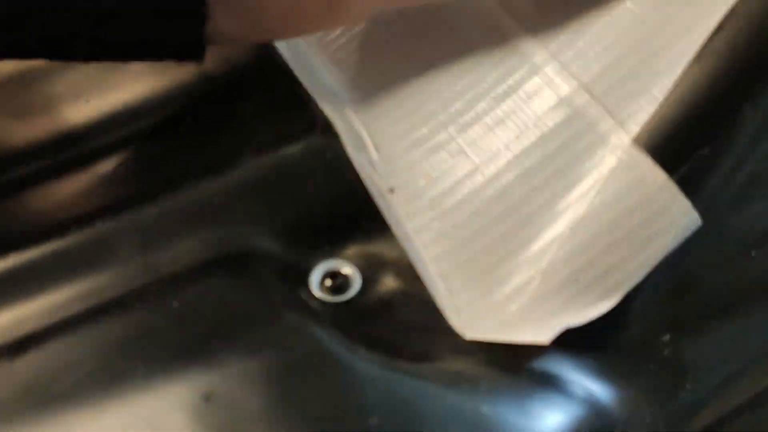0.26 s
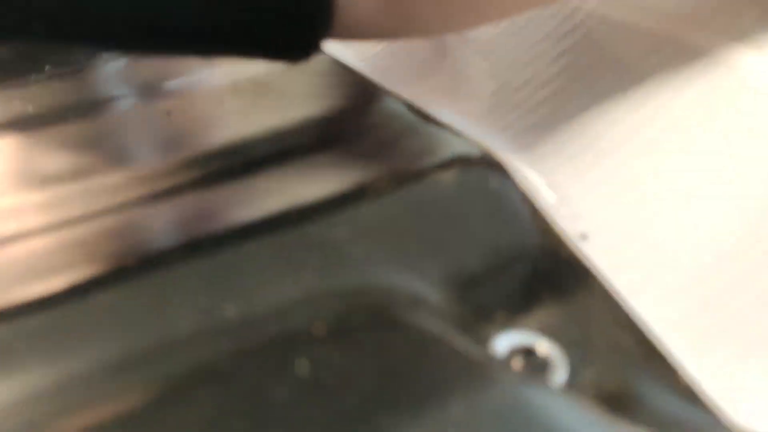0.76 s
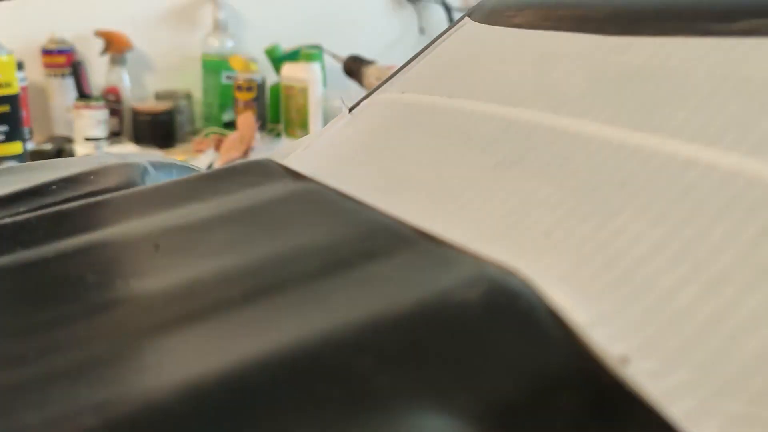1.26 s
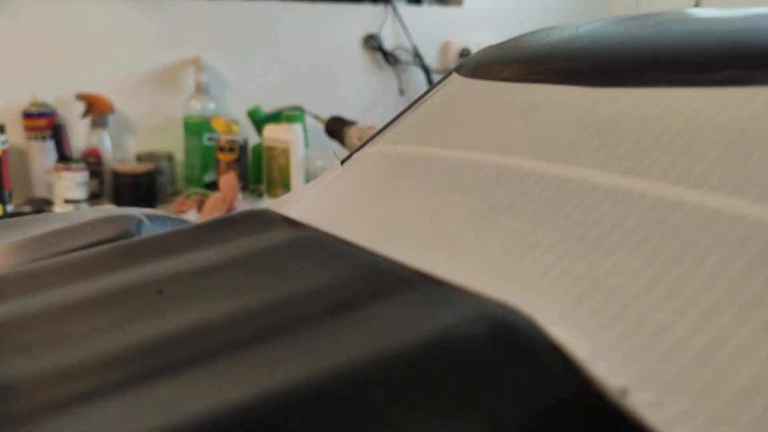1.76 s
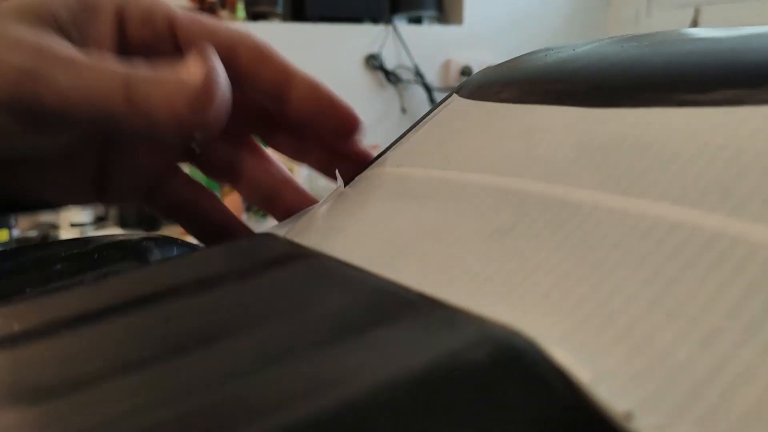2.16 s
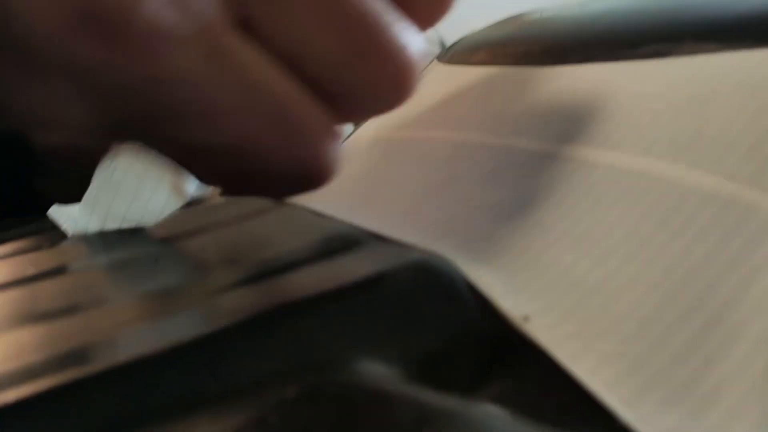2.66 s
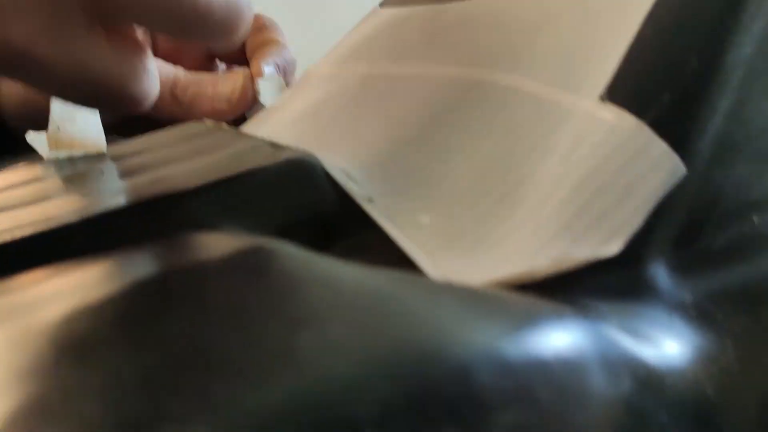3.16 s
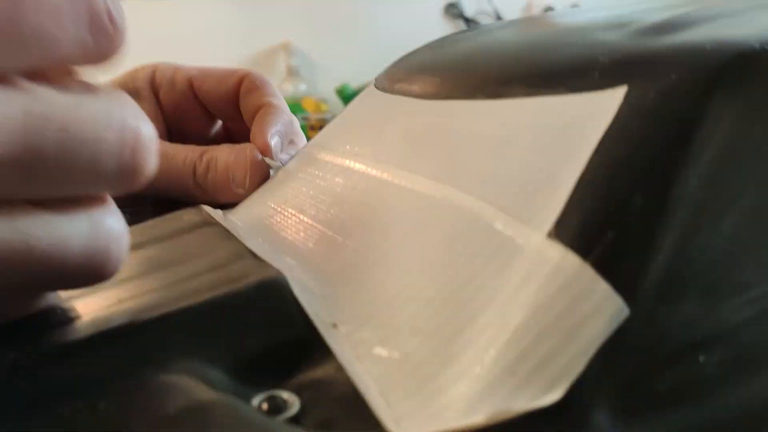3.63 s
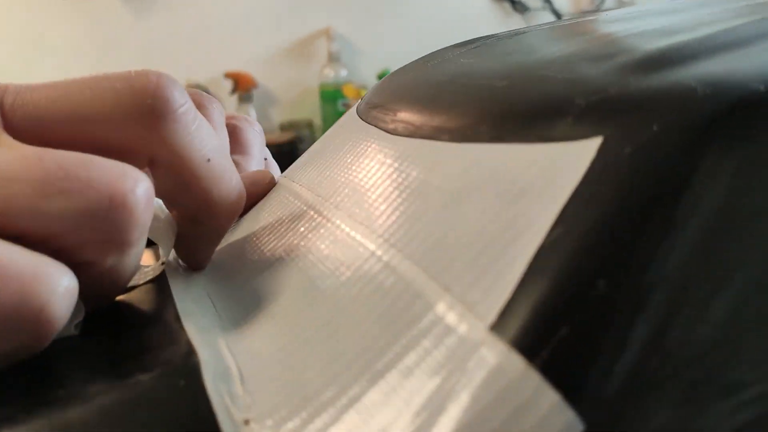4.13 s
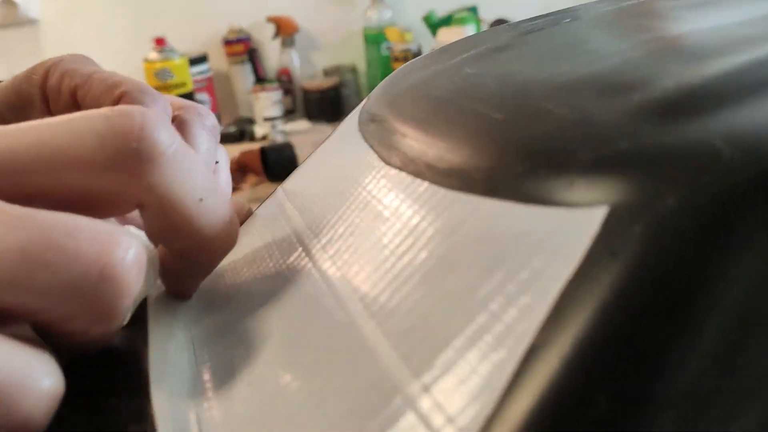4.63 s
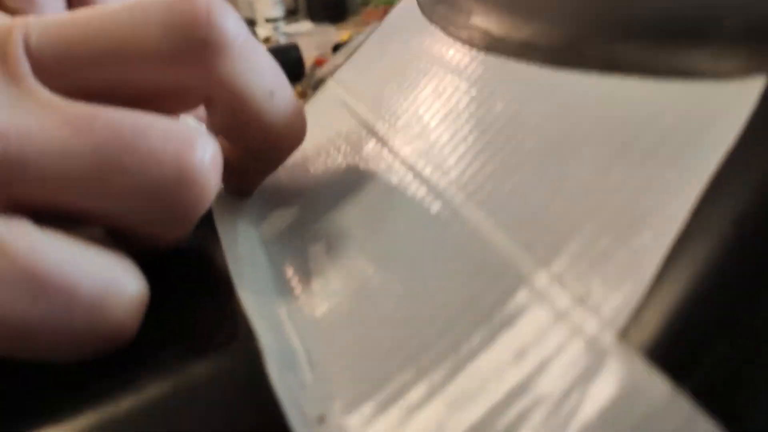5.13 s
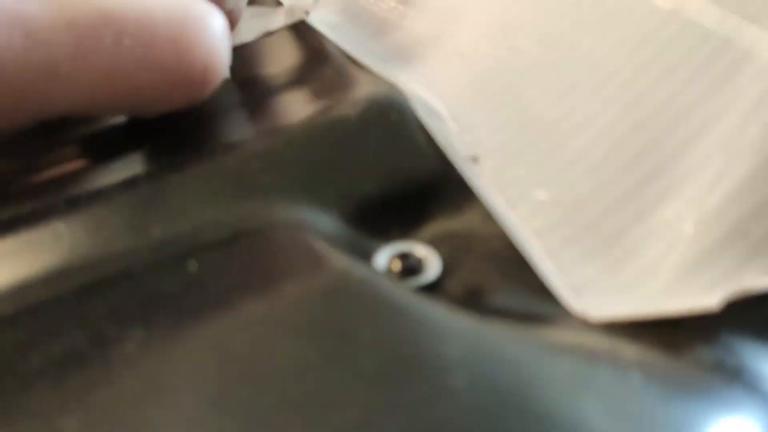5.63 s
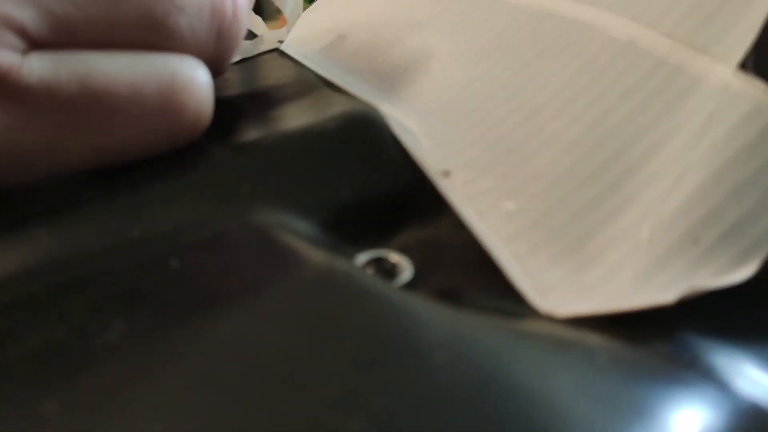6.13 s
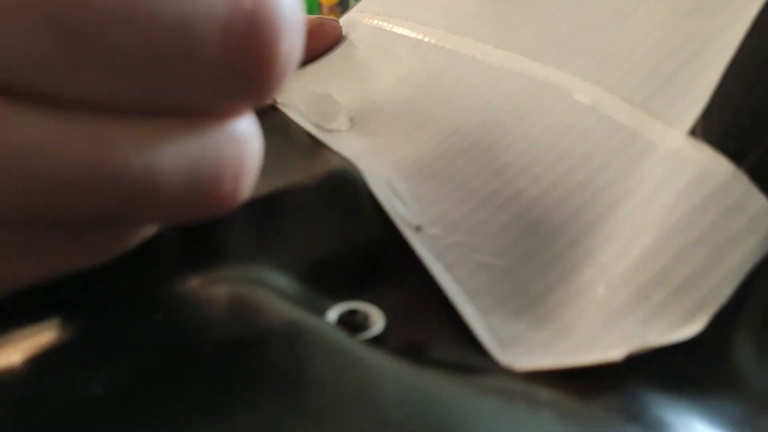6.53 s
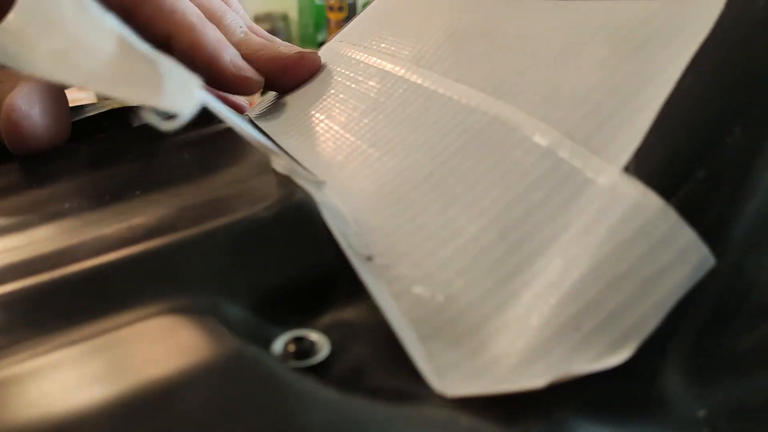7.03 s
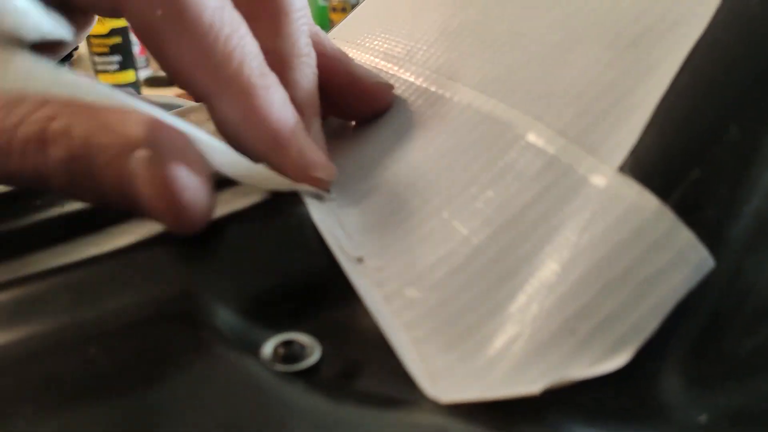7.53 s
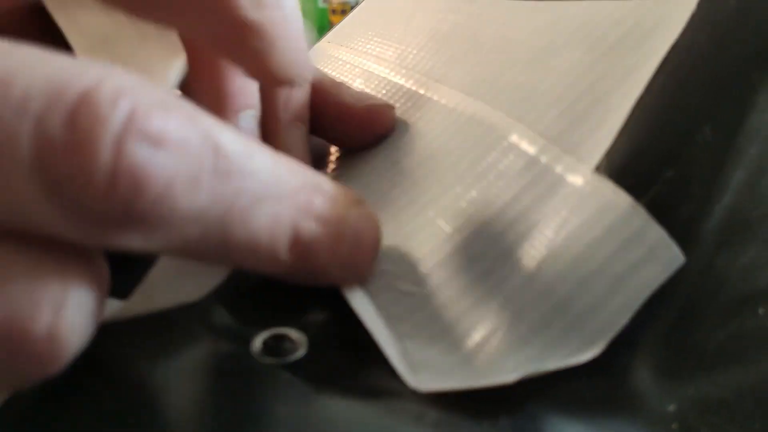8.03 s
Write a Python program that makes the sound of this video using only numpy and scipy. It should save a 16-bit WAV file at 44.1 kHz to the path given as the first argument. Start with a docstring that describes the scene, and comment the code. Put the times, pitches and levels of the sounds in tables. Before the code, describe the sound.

Close crackling of tape pulled unevenly from thick plastic: dry glue snaps, brief rasping rips, soft finger rubbing and hollow knocks in a small workshop.

```python
"""Masking tape is picked and pulled off a thick, hollow plastic shell in a workshop, close to the microphone.
The glue lets go in single snaps (a crack in the tape and a pluck of the shell) and in short stick-slip
rips that drum on the shell. Between pulls, fingers bump the plastic as ringing dents, rub tape and
masking sheet as shaped noise and fine grains, and freed tape crumples in bursts of paper ticks.
Behind it lie a short room tail, a faint low rumble and one dull thump through the microphone housing."""
import sys
import numpy as np
from scipy import signal
from scipy.fft import rfft, irfft, next_fast_len
from scipy.io import wavfile
from scipy.ndimage import uniform_filter1d

SR = 44100
rng = np.random.default_rng(int(sys.argv[2]) if len(sys.argv) > 2 else 0)


def wrap_up_sound(samples):
    """Save the sound to the file named by the first command line argument, as 16-bit audio."""
    columns = np.atleast_2d(samples).T
    # keep every value between -1 and 1, then stretch to whole-number steps
    tamed = np.clip(columns, -1, 1)
    steps = np.round(tamed * 32767).astype(np.int16)
    wavfile.write(sys.argv[1], SR, steps)


N = 365588
TIME = np.arange(N) / SR


def amp(db):
    """Amplitude factor for a level in dB."""
    return 10 ** (np.asarray(db) / 20)


def at_hz(points, hz):
    """Read a table on a log-frequency axis."""
    f, value = np.transpose(points)
    return np.interp(np.log(hz + 1), np.log(f), value)


def in_time(rows):
    """The columns of a curve at every sample."""
    s, *columns = np.transpose(rows)
    return [np.interp(TIME, s, column) for column in columns]


def unit(x):
    """Scale to a mean power of one, summed over the last axis: unit energy per channel."""
    return x / np.sqrt(np.mean(np.sum(x ** 2, axis=-1)) + 1e-20)


def through(x, response):
    """Stereo convolution, cut to the length of x."""
    return signal.oaconvolve(np.atleast_2d(x), np.atleast_2d(response), axes=-1)[:, :x.shape[-1]]


def filtered(x, order, hz, kind="low"):
    """Butterworth filter."""
    return signal.sosfilt(signal.butter(order, hz, kind, fs=SR, output="sos"), x)


def split(x, hz):
    """Low and high halves of a crossover; they stay in phase."""
    return [filtered(filtered(x, 2, hz, side), 2, hz, side) for side in ("low", "high")]


def colour(spectrum, size=2048):
    """Causal (minimum-phase) response with this spectrum, by folding its cepstrum."""
    hz = np.arange(size // 2 + 1) * SR / size
    cepstrum = irfft(np.log(amp(at_hz(spectrum, hz))))
    cepstrum[1:size // 2] *= 2
    cepstrum[size // 2 + 1:] = 0
    return unit(irfft(np.exp(rfft(cepstrum))))


def varied(spectrum, spread_db):
    """The same spectrum with each point shifted at random."""
    return [(hz, db + rng.normal(0, spread_db)) for hz, db in spectrum]


# likeness of the two microphone ports: f/Hz, correlation/1
PORT_LIKENESS = [(100, 0.55), (300, 0.84), (700, 0.9), (1400, 0.17), (3000, 0.0071)]


def diffuse(size):
    """Stereo noise, alike in the bass and unrelated in the treble."""
    padded = next_fast_len(size, True)
    mid, side = rfft(rng.standard_normal((2, padded)))
    alike = np.clip(at_hz(PORT_LIKENESS, np.linspace(0, SR / 2, len(mid))), -1, 1)
    common = np.sqrt((1 + alike) / 2) * mid
    opposed = np.sqrt((1 - alike) / 2) * side * [[1], [-1]]
    return irfft(common + opposed, padded)[:, :size]


def dying(t60, size):
    """Envelope that falls 60 dB in t60 seconds."""
    return np.exp(-np.log(1000) * TIME[:size] / t60)


def ragged(size):
    """A gain that jumps every millisecond (44 samples)."""
    return np.repeat(amp(rng.normal(0, 5, size // 44 + 1)), 44)[:size]


def add(track, s, sound):
    """Mix a sound into a track at time s."""
    i = max(int(s * SR), 0)
    track[:, i:i + sound.shape[-1]] += sound[..., :max(N - i, 0)]


def slips(per_s, spread_db):
    """Random tiny releases of uneven size, rms 1."""
    excess = np.minimum(rng.exponential(1, N), 4)
    sizes = amp(spread_db * excess) * rng.choice([-1, 1], N)
    return unit(sizes * (rng.random(N) < per_s / SR)) * np.sqrt(N)


def rumble(level_db=-82, below_hz=130):
    """The faint low background of the workshop: low-passed noise."""
    return amp(level_db) * np.sqrt(N) * unit(filtered(diffuse(N), 2, below_hz))


# how the walls colour the room tail: f/Hz, relative level/dB
WALL_COLOUR = [(60, 9), (300, 7.5), (6500, 1), (9000, 3), (16000, -24)]


def workshop(x, wet_db=-13, t60_s=0.23, build_s=0.00025, size=16000):
    """The room answers with a diffuse tail that builds up over the first reflections."""
    build_up = 1 - np.exp(-(TIME[:size] / build_s) ** 2)
    tail = unit(diffuse(size) * dying(t60_s, size) * build_up)
    return amp(wet_db) * through(x, through(tail, colour(WALL_COLOUR)))


# the hand jogs the microphone: t/s, level before the low-pass/dB
MICROPHONE_JOLTS = [(1.026, -41)]


def jolts(hz=62, t60=0.016, below_hz=220, size=6000):
    """A dull thump, a quickly damped low swing, reaches the microphone through its housing."""
    out = np.zeros((2, N))
    for s, db in MICROPHONE_JOLTS:
        add(out, s, amp(db) * np.cos(2 * np.pi * hz * TIME[:size]) * dying(t60, size))
    return filtered(out, 2, below_hz)


# the place being worked on: t/s, give of the shell/1 (0 = rigid),
# crispness of the tape/dB, left-over-right balance of the tape/dB
WORKED_PLACE = [(.6, 0.18, -7.5, -0.5), (1.1, 0.43, 7.5, -2), (2.2, 0.19, -7, -2.5),
                (3.3, 0.65, -5.5, -3.5), (4.3, 0.62, -13.5, -3), (5.1, 0.83, 1, 0), (6.6, 0.81, -2, -1),
                (7.2, 1, -10, -1.5), (7.45, 0.76, 3.5, -0.5), (8.2, 0.68, 3, -4)]


def at_place(x, below_hz=310, middle_hz=1400, above_hz=7500):
    """Bass follows the give of the shell, top the crispness of the tape, treble balance where the tape is."""
    give, crisp_db, balance_db = in_time(WORKED_PLACE)
    bass, rest = split(x, below_hz)
    body, top = split(give * bass + rest, above_hz)
    shell, tape = split(body + amp(crisp_db) * top, middle_hz)
    return shell + tape * amp([balance_db / 2, -balance_db / 2])


def swell(t, length, attack_s=0.021, release_s=0.024):
    """Envelope of one sliding movement, t seconds after its start: attack, hold, release."""
    return np.clip(t / attack_s, 0, 1) * np.exp(-np.clip((t - length) / release_s, 0, 30))


# fingertips catching on the masking sheet: start t/s, length t/s, force level/dB
SHEET_SCRAPES = [(0.093, 0.0085, -48), (0.201, 0.0076, -45), (0.24, 0.019, -47.5)]


def scrapes(low_hz=1400, high_hz=2250):
    """Skin chatters on the taut sheet in tiny slips, which the sheet answers in a narrow band."""
    force = sum(amp(db) * swell(TIME - start, length) for start, length, db in SHEET_SCRAPES)
    sheet = filtered(diffuse(size=900) * dying(0.019, size=900), 1, [low_hz, high_hz], "band")
    return through(force * slips(per_s=350, spread_db=3), unit(sheet))


# fingers sliding: start t/s, length t/s, hiss drive of the tape level/dB, murmur drive of the shell level/dB
FINGER_STROKES = [(0.0, 0.085, -63.5, -57), (0.332, 0.25, -86, -57), (0.662, 0.092, -62, -60.5),
                  (0.973, 0.13, -62.5, -55), (1.413, 0.12, -53.5, -85), (1.606, 0.31, -59, -98),
                  (1.78, 0.063, -48.5, -44), (1.998, 0.043, -38, -40), (2.007, 0.63, -54.5, -54.5),
                  (2.109, 0.15, -48, -77), (2.543, 0.044, -44, -72), (2.8, 0.24, -48.5, -56.5),
                  (3.067, 0.49, -57, -68), (3.571, 0.023, -51, -64), (3.675, 0.78, -54, -63.5),
                  (3.885, 0.14, -54.5, -54.5), (4.456, 0.29, -57.5, -61.5), (4.853, 0.033, -91, -58),
                  (5.21, 0.33, -60.5, -58), (5.709, 0.082, -59, -63), (5.831, 0.16, -57.5, -50),
                  (6.14, 0.25, -59.5, -62.5), (7.156, 0.46, -75, -52), (7.877, 0.17, -57, -56.5),
                  (8.081, 0.33, -60, -61)]


def sliding(uneven_db=3, catches_per_s=45, resting_hiss_db=-70, resting_murmur_db=-65):
    """Drive of hiss and murmur: stroke powers add to a resting motion, and the skin grips unevenly."""
    # the hands never lie quite still
    power = np.ones((2, N)) * amp([[resting_hiss_db], [resting_murmur_db]]) ** 2
    for start, length, hiss_db, murmur_db in FINGER_STROKES:
        stroke = amp([[hiss_db], [murmur_db]]) * swell(TIME[:SR], length)
        add(power, start, stroke ** 2)
    grip = np.interp(TIME * catches_per_s, np.arange(1000), rng.standard_normal(1000))
    return np.sqrt(power) * amp(uneven_db * grip)


# colour of crumpling paper: f/Hz, relative level per Hz/dB
PAPER_COLOUR = [(200, -15), (1000, -11), (2400, 4.5), (3600, 0.5), (6000, -1), (7800, -12.5),
                (15000, -20.5)]


def creases(per_s, spread_db, count=3, flip_t60=0.006, size=300):
    """Creases of the paper flip at random; each is a dry, broad tick with one of a few colours. rms 1."""
    out = np.zeros((2, N))
    for _ in range(count):
        tint = colour(varied(PAPER_COLOUR, 2))
        flip = unit(through(diffuse(size) * dying(flip_t60, size), tint))
        out += through(slips(per_s / count, spread_db), flip)
    return np.sqrt(N) * unit(out)


def crinkles(clusters_per_s=70, cluster_db=3.5):
    """The paper crackles in uneven clusters under a sliding finger. rms 1."""
    wander = np.clip(rng.standard_normal(1000), -2, 2)
    cluster = amp(cluster_db * np.interp(TIME * clusters_per_s, np.arange(1000), wander))
    return np.sqrt(N) * unit(cluster * creases(per_s=900, spread_db=3))


def patchy(x, patchy_db=4, size=256):
    """Each band flickers on its own, as the contact keeps moving over new fibres."""
    bands = signal.stft(x, nperseg=size)[2]
    wander = rng.standard_normal(bands.shape[1:])
    for axis in (0, 1):
        wander = uniform_filter1d(wander, size=4, axis=axis)
    gain = amp(patchy_db * wander / wander.std())
    flickering = bands * gain / np.sqrt(np.mean(gain ** 2))
    return signal.istft(flickering, nperseg=size)[1][:, :N]


# hiss of the tape: f/Hz, relative level per Hz/dB
TAPE_HISS = [(300, -30), (1500, -6.5), (2800, 1), (4200, 12), (6300, 15.5), (7800, 6.5), (11000, 2.5),
             (15500, -40)]
# murmur of the shell: f/Hz, relative level per Hz/dB
SHELL_MURMUR = [(25, 9), (60, 0.5), (140, -4), (280, 5), (480, 5), (650, 3), (1200, -0.5), (2100, 1.5),
                (3500, -5), (8000, -17.5)]


def rubbing(tape, shell, hiss_db=-8, grain_db=-6, murmur_db=-1, drag_grain_db=-3):
    """Skin slides over crepe paper: a fine hiss with clusters of crinkles, and the shell murmurs along."""
    scatter = unit(diffuse(size=300) * dying(0.0057, size=300))
    grains = through(slips(per_s=300, spread_db=4.5), scatter)
    friction = tape * (amp(hiss_db) * diffuse(N) + amp(grain_db) * grains)
    drag = shell * amp(murmur_db) * (diffuse(N) + amp(drag_grain_db) * grains)
    paper = through(friction, colour(TAPE_HISS)) + tape * crinkles()
    return patchy(paper) + through(drag, colour(SHELL_MURMUR))


# loosened tape crumples after a snap: t/s, starting level/dB, t60 t/s
TAPE_CRUMPLES = [(3.312, -39, 0.11), (4.334, -30, .16), (4.601, -35, 0.16), (4.638, -38, 0.082),
                 (5.362, -52, 0.056)]


def crumples():
    """Freed tape folds up in a dense run of creases that dies away."""
    force = np.zeros((2, N))
    for s, db, t60 in TAPE_CRUMPLES:
        add(force, s, amp(db) * dying(t60, size=16000))
    return force * creases(per_s=2500, spread_db=3)


# modes of the plastic shell: f/Hz, relative level/dB, t60 t/s
SHELL_MODES = [(288, -3, 0.072), (414, -9.5, 0.085), (501, 3, 0.045), (727, -11, 0.16), (1048, -4.5, 0.055),
               (1310, 0.5, 0.024), (1555, -6.5, 0.039), (1802, -2, 0.019), (1960, 7, 0.021),
               (2195, -1, 0.014), (2483, 3, 0.02), (2945, 10.5, 0.014)]
# dense waves in the shell panel: f/Hz, relative level per Hz/dB
PANEL_COLOUR = [(30, -53), (85, -22), (150, -11.5), (270, 0.5), (380, -2), (510, 8), (660, -1), (950, 1.5),
                (1500, -2), (2300, 2), (3500, -7.5), (16000, -44.5)]


def shell_response(modes_db=-4, push_db=-5, panel_t60=0.041, flex_db=-5, flex_hz=1500, flex_t60=0.01,
                   size=6000):
    """One spot of the shell: a push, a quick flex of its own pitch, dense panel waves and ringing modes."""
    hz, db, t60 = np.transpose(SHELL_MODES)
    rings = np.sin(2 * np.pi * hz[:, None] * TIME[:size]) * dying(t60[:, None], size)
    # each spot excites the modes differently, more alike at both ports in the bass
    alike = np.clip(at_hz(PORT_LIKENESS, hz), 0, 1)
    shared, *own = rng.standard_normal((3, len(hz)))
    strength = np.sqrt(alike) * np.sign(shared) + np.sqrt(1 - alike) * np.array(own)
    modes = (amp(db) * strength) @ rings
    panel = unit(diffuse(size) * dying(panel_t60, size))
    panel[:, 0] -= amp(push_db)
    panel = through(panel, colour(varied(PANEL_COLOUR, 2.5)))
    spot_hz = flex_hz * 2 ** rng.uniform(-.7, .7)
    flex = -np.cos(2 * np.pi * spot_hz * TIME[:size]) * dying(flex_t60, size)
    return unit(unit(panel) + amp(modes_db) * unit(modes) + amp(flex_db) * unit(flex))


# fingertips landing on the shell: t/s, relative level/dB, pitch of the dent f/Hz, its t60 t/s
FINGER_BUMPS = [(0.798, -40, 540, 0.004), (0.886, -43, 470, 0.005), (1.216, -57, 237, 0.018),
                (2.003, -24, 500, 0.009), (2.287, -44.5, 307, 0.051), (2.493, -22, 271, 0.028),
                (2.911, -47, 191, 0.46), (2.93, -36.5, 410, 0.034), (3.077, -44, 293, 0.015),
                (3.275, -34.5, 441, 0.36), (3.389, -34.5, 380, 0.035), (3.54, -33.5, 467, 0.0022),
                (3.684, -23, 490, 0.013), (3.836, -29, 465, 0.031), (3.993, -36.5, 610, 0.0096),
                (3.996, -35, 290, 0.039), (4.892, -48, 520, 0.14), (5.716, -46.5, 446.6, 0.023),
                (7.765, -40.5, 534, 0.011)]
# slow ringing of the whole hollow body: f/Hz, relative level/dB, t60 t/s
BODY_MODES = [(200.6, -13.5, 0.45), (276, 6.5, 0.056), (398.5, -1.5, 0.19), (470.4, -0.5, 0.19),
              (655, -8, 0.1), (734, -9, 0.18)]


def bumps(level_db=1, rise_s=0.0011, shell_db=-6, rattle_db=-5, rattle_t60=0.21, body_db=-2, knock_db=-5,
          low_hz=160, size=16000):
    """A fingertip dents the shell, which swings, knocks and rings the whole body near the dent's pitch."""
    out, t = np.zeros((2, N)), TIME[:size]
    body_hz, mode_db, body_t60 = np.transpose(BODY_MODES)
    rings = np.sin(2 * np.pi * body_hz[:, None] * t) * dying(body_t60[:, None], size)
    count = len(body_hz)
    for s, db, hz, t60 in FINGER_BUMPS:
        swing = -np.sin(2 * np.pi * hz * t) * dying(t60, size) * (1 - np.exp(-t / rise_s))
        strength = amp(mode_db + rng.normal(0, 3, count)) * rng.choice([-1, 1], count)
        body = unit(strength @ rings)
        rattle = unit(diffuse(size) * dying(rattle_t60, size))
        waves = amp(shell_db) * shell_response(size=size) + amp(rattle_db) * rattle + amp(body_db) * body
        knock = filtered(waves, 2, [hz / 1.47, hz * 1.57], "band")
        thud = unit(swing) + amp(knock_db) * unit(knock)
        add(out, s, amp(db + level_db) * thud / np.abs(thud).max())
    return filtered(out, 4, low_hz, "high")


# the first threads part up to LOADING_S ahead of a snap, most within THREAD_SPREAD_S of it
LOADING_S, THREAD_SPREAD_S = 0.006, 0.0013
# crack of the tape: f/Hz, relative level per Hz/dB
CRACK_COLOUR = [(40, -42), (100, -30), (500, -6), (1500, -1), (3000, 6.5), (6200, 6), (8000, 3.5),
                (11000, -3), (15500, -24.5)]


def crack(hz, threads_db=0, ring_t60=0.0044, ring_db=-5, splinter_t60=0.02, splinter_db=-4,
          flutter_t60=0.068, flutter_db=-11, flutter_hz=6200, size=2400):
    """A sharp release after LOADING_S, a splutter of glue threads around it and swings of the taut tape."""
    splinter = diffuse(size) * ragged(size) * dying(splinter_t60, size)
    flutter = split(diffuse(size) * ragged(size) * dying(flutter_t60, size), flutter_hz)[0]
    burst = amp(splinter_db) * unit(splinter) + amp(flutter_db) * unit(flutter)
    burst[:, 0] -= 1
    lead = int(LOADING_S * SR)
    burst = np.pad(burst, [(0, 0), (lead, 0)])
    # a few threads part just before and after the main release
    offset = np.clip(rng.laplace(0, THREAD_SPREAD_S, size=6), -LOADING_S, LOADING_S)
    threads = np.zeros_like(burst)
    thread_at = ((LOADING_S + offset) * SR).astype(int)
    threads[:, thread_at] = diffuse(size=6) * np.exp(-np.abs(offset) / THREAD_SPREAD_S / 2)
    burst += amp(threads_db) * unit(threads)
    burst = through(burst, colour(varied(CRACK_COLOUR, 2.5)))
    ring = unit(np.cos(2 * np.pi * hz * TIME[:size]) * dying(ring_t60, size))
    return unit(unit(burst) + amp(ring_db) * np.pad(ring, (lead, 0)))


def slip_crack(hz, size, dull_hz=8000):
    """The crack of one slip in a fast pull: dry, without a lead-in, and duller than a lone snap."""
    sharp = crack(hz, threads_db=-8, ring_db=-1, splinter_db=-6, flutter_db=-16, size=size)
    return filtered(sharp[:, int(LOADING_S * SR):], 2, dull_hz)


SLIPS_PER_S = 190   # mean rate at which the glue gives way in a pull


def jerks(size):
    """Grip of the glue in a pull: it gives way at uneven moments and the tearing fades until the next."""
    moments = np.cumsum(rng.uniform(.1, 1.9, size=80)) / SLIPS_PER_S
    last = np.searchsorted(moments, TIME[:size])
    since = TIME[:size] - np.append(0, moments)[last]
    strength = amp(rng.normal(0, 2.5, len(moments) + 1))
    gain = strength[last] * np.exp(-since * SLIPS_PER_S * 1.3)
    return moments, gain / np.sqrt(np.mean(gain ** 2))


# fast pulls: start t/s, length t/s, peak force level/dB, build-up t/s
FAST_PULLS = [(0.454, 0.12, -20, 0.079), (0.563, 0.063, -28.5, 0.007), (5.061, 0.1, -36.5, 0.057),
              (6.444, 0.097, -24.5, 0.019), (6.714, 0.12, -21.5, 0.018), (6.816, 0.017, -23, 0.0034)]


def rips(shell_db=-8, tear_db=-10, stick_db=5, stick_crack_db=-4, ring_hz=2800, start_db=-20.5,
         release_s=0.0084, size=3000):
    """Glue sticks and slips; each slip frees a rasp of threads and rings a stretch of tape and shell spot."""
    out = np.zeros((2, N))
    rasp = slips(per_s=2500, spread_db=3)
    spots = []
    for hz in np.geomspace(ring_hz / 2, ring_hz * 2, 10):
        spot = amp(shell_db + stick_db) * shell_response(size=size)
        spots.append(spot + amp(stick_crack_db) * slip_crack(hz, size))
    for start, length, peak_db, build_s in FAST_PULLS:
        span = slice(int(start * SR), int(start * SR) + SR // 3)
        t = TIME[span] - start
        # a pull starts start_db relative to its peak and stops within release_s
        build_up = amp(peak_db + start_db * np.clip(1 - t / build_s, 0, 1))
        force = build_up * np.clip(1 - (t - length) / release_s, 0, 1)
        moments, grip = jerks(len(t))
        fine = force * grip * rasp[span]
        tape = unit(through(diffuse(size=600) * dying(0.035, size=600), colour(TAPE_HISS)))
        add(out, start, amp(shell_db) * through(fine, shell_response()) + amp(tear_db) * through(fine, tape))
        for delay in moments[moments < length + release_s]:
            tug = np.interp(delay, t, force) * np.sqrt(SR / SLIPS_PER_S) * amp(rng.uniform(-5, 2))
            add(out, start + delay, tug * spots[rng.integers(len(spots))])
    return out


# glue snaps and tape crinkles that stand out: t/s, relative crack level/dB, relative shell level/dB
GLUE_SNAPS = [(0.2533, -40.5, -51), (0.43, -39.5, -49.5), (0.46, -25, -27), (0.4861, -23.5, -23.5),
              (0.5015, -25.5, -26.5), (0.5164, -19.5, -23), (.5332, -27, -32), (0.5416, -25, -26),
              (0.55, -29, -30), (0.557, -28, -30.5), (0.5715, -20, -35.5), (0.592, -34, -32),
              (0.623, -32, -35), (0.6953, -45, -73), (0.799, -66, -56), (0.886, -71, -58),
              (1.0821, -38.5, -49.5), (1.186, -52.5, -54), (1.327, -49.5, -80), (1.483, -35.5, -74),
              (1.503, -27.5, -60), (1.7022, -25.5, -61), (2.1198, -47, -71), (2.1754, -43, -54),
              (2.204, -34, -72), (2.242, -29.5, -77), (2.365, -37.5, -64), (2.5877, -53, -71),
              (2.477, -43, -59), (2.657, -42, -52.5), (2.6978, -33.5, -55), (2.705, -35.5, -53),
              (2.9075, -25.5, -32), (2.9688, -40.5, -68), (3.0888, -50, -58.5), (3.1294, -49, -75),
              (3.1798, -37.5, -57), (3.23, -41, -55), (3.261, -39, -47), (3.2768, -22, -34.5),
              (3.3097, -23.5, -33.5), (3.392, -29, -37), (3.329, -31, -43), (3.6526, -38, -54),
              (3.8615, -34.5, -36.5), (3.91, -37.5, -51), (3.949, -42, -55), (4.257, -45, -50),
              (4.3335, -25, -28.5), (4.577, -29, -30.5), (4.5969, -27.5, -27.5), (4.6388, -29, -34.5),
              (4.899, -67, -47), (4.9741, -41.5, -57), (5.06, -34, -36.5), (5.068, -30.5, -26),
              (5.0921, -31, -30.5), (5.1091, -28.5, -25.5), (5.1269, -45, -26.5), (5.1445, -48, -28.5),
              (5.1928, -29.5, -29), (5.2562, -45, -47), (5.2894, -44, -50.5), (5.3199, -39, -50),
              (5.345, -39, -46.5), (5.36, -36.5, -36), (5.367, -42, -37), (5.4387, -45.5, -56),
              (5.471, -42, -52.5), (5.643, -44, -55), (5.7326, -47, -48.5), (5.75, -50, -58),
              (5.7686, -33, -47), (5.936, -34.5, -36.5), (5.9656, -36.5, -35.5), (6.1531, -39, -46.5),
              (6.3272, -42, -37.5), (6.3993, -41, -47.5), (6.4407, -26, -22.5), (6.454, -28, -28),
              (6.4645, -26, -27.5), (6.4807, -27, -28), (6.493, -34, -27), (6.5285, -22, -33),
              (6.534, -21.5, -24.5), (6.5644, -28, -42), (6.584, -23, -28.5), (6.6081, -24, -23.5),
              (6.622, -33, -58), (6.637, -32.5, -62), (6.7004, -32.5, -36.5), (6.7069, -25.5, -25.5),
              (6.7316, -34, -19.5), (6.767, -38, -20.5), (6.8128, -42, -21), (6.8199, -25.5, -24),
              (6.9772, -22.5, -21), (7.0195, -39, -48), (7.053, -45.5, -59), (7.1076, -47, -51.5),
              (7.1364, -44, -51.5), (7.2211, -17.5, -21.5), (7.244, -43, -48), (7.324, -43.5, -54),
              (7.3762, -21.5, -22.5), (7.5011, -23, -19.5), (7.562, -38.5, -46), (7.575, -40.5, -50),
              (7.7495, -70, -39), (7.7976, -51.5, -56.5), (7.812, -49, -54.5), (7.854, -49, -57),
              (7.8781, -50, -75), (7.8978, -37.5, -36), (8.037, -38.5, -65), (8.045, -34, -61),
              (8.0828, -47, -65), (8.1117, -48.5, -62), (8.163, -33.5, -45), (8.175, -42, -49.5),
              (8.252, -34, -47), (8.26, -38, -40.5), (8.271, -36, -51), (8.2853, -31, -41)]


def snaps(crack_db=19.5, shell_db=26.5, edge_db=8.0, stuck_hz=2400, free_hz=5900, stuck_db=-3, free_db=10):
    """Each release cracks the tape and plucks the shell; free tape hardly moves the shell and rings higher."""
    out = np.zeros((2, N))
    for s, tape_db, pluck_db in GLUE_SNAPS:
        hz = np.interp(tape_db - pluck_db, [stuck_db, free_db], [stuck_hz, free_hz])
        hz *= np.exp(rng.normal(0, .1))
        # a hard snap parts all at once with a sharp edge, a light one thread by thread
        hardness = np.interp(tape_db, [-30, -21], [0, 1])
        add(out, s - LOADING_S, amp(tape_db + crack_db) * crack(hz, threads_db=-6 * hardness))
        add(out, s, hardness * amp(tape_db + edge_db) * np.array([-1, 0, 1 / 2]))
        add(out, s, amp(pluck_db + shell_db) * shell_response(size=4000))
    return out


def scene(left_db=-1.5, right_db=0.0, right_lead=7):
    """The work lies a little to the right, which is louder and leads by right_lead samples."""
    tape, shell = sliding()
    worked = at_place(snaps() + rips() + rubbing(tape, shell) + crumples())
    near = worked + bumps() + scrapes()
    left, right = near + workshop(near) + rumble() + jolts()
    left = np.pad(left, (right_lead, 0))[:N]
    return np.array([amp(left_db) * left, amp(right_db) * right])


def record(dry, low_hz=45, cutoff_hz=16500):
    """The microphone loses the deep bass; the top is cut steeply."""
    dry = filtered(dry, 2, low_hz, "high")
    return signal.sosfilt(signal.ellip(10, .1, 70, cutoff_hz, fs=SR, output="sos"), dry)


dry = scene()
out = record(dry)
wrap_up_sound(out)
```